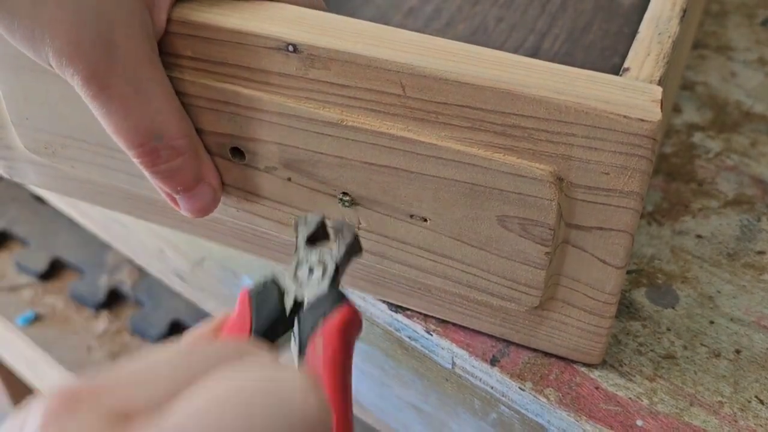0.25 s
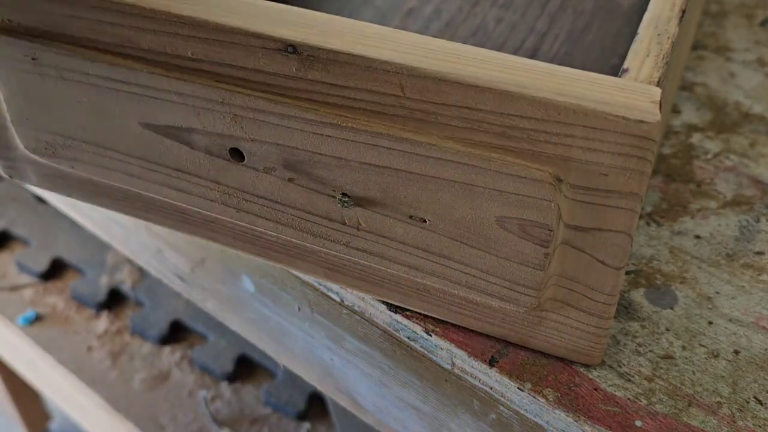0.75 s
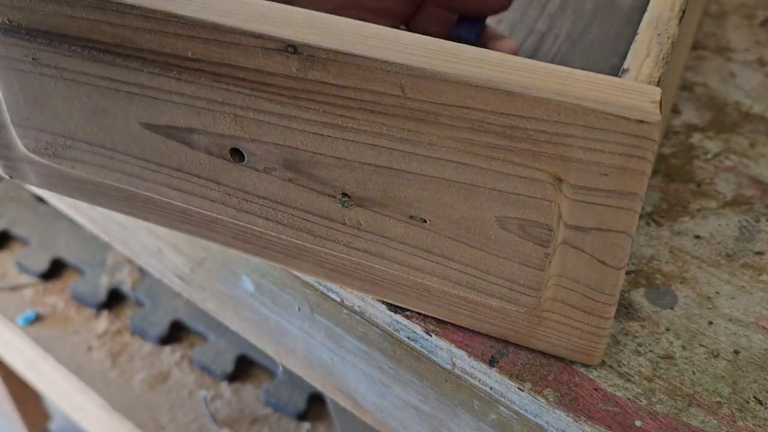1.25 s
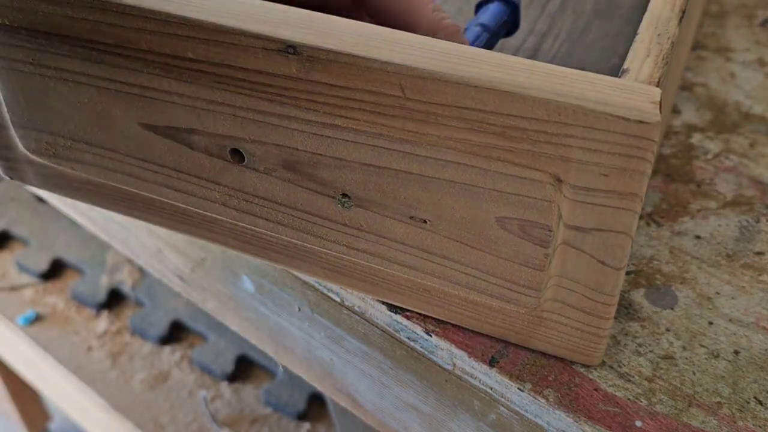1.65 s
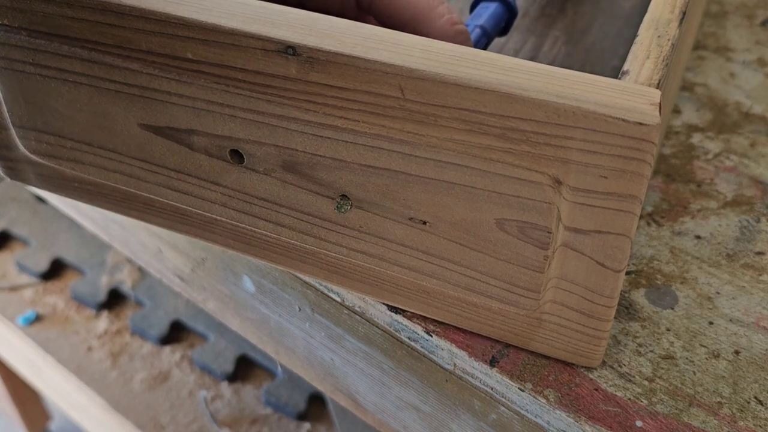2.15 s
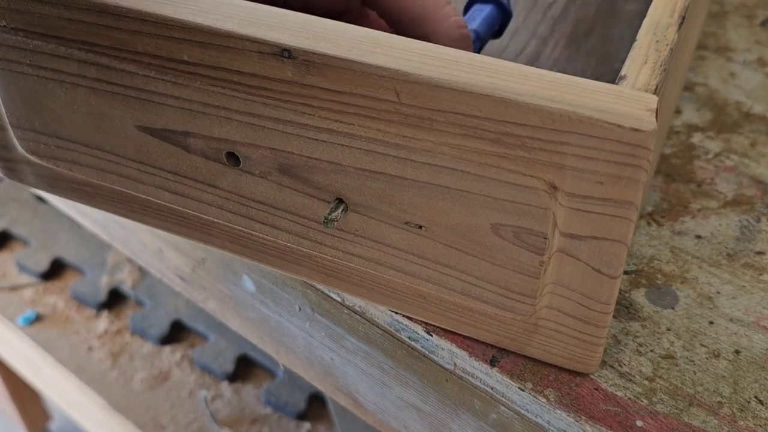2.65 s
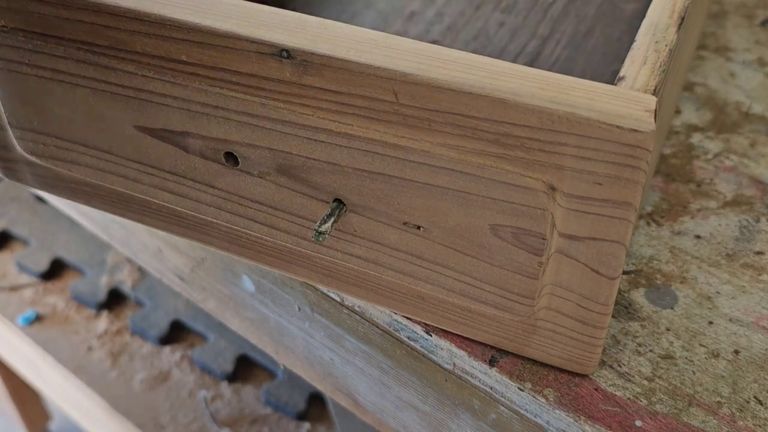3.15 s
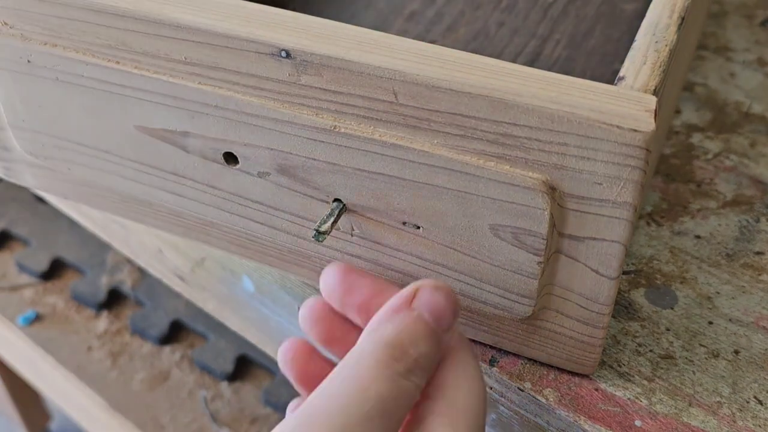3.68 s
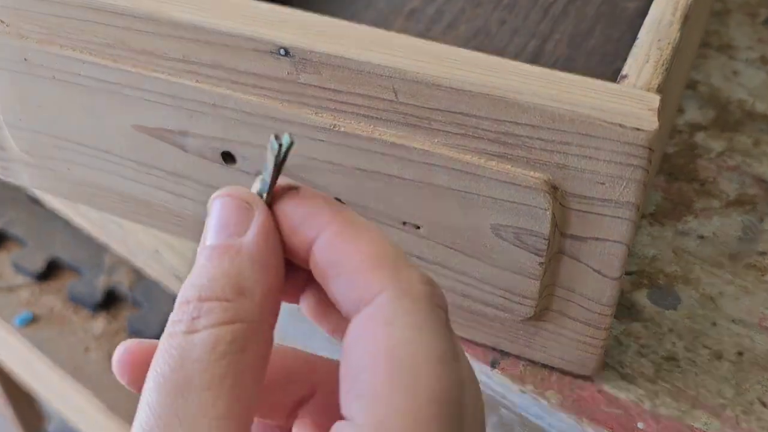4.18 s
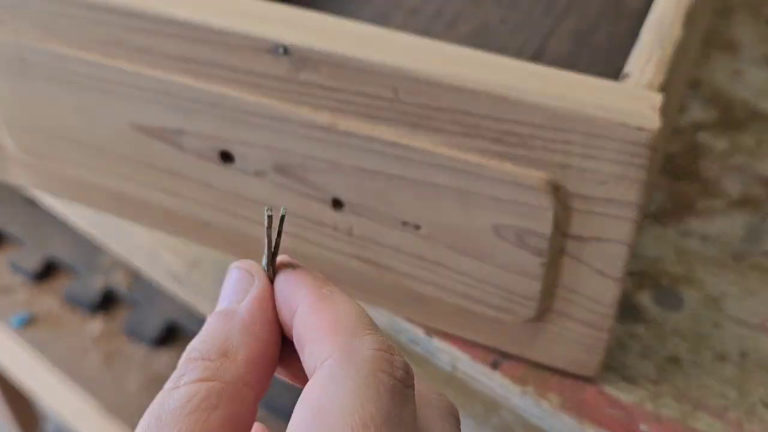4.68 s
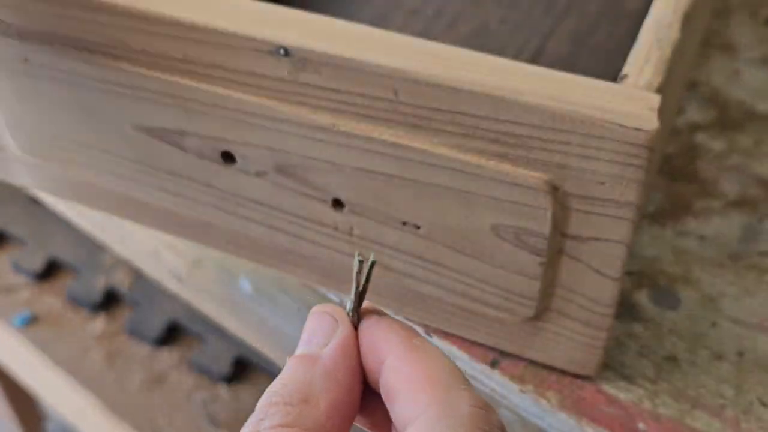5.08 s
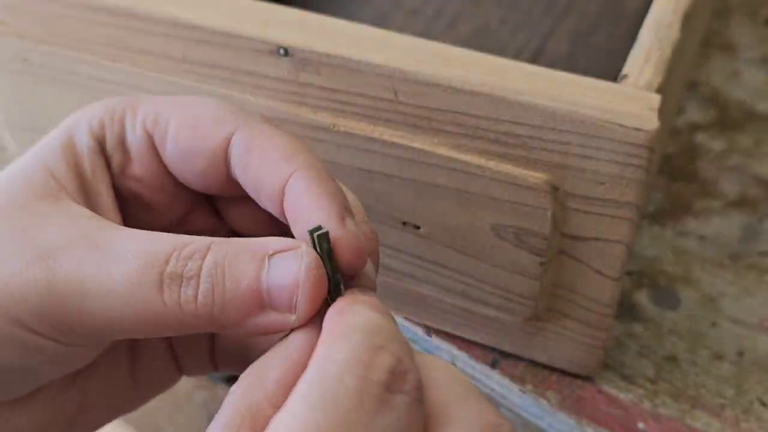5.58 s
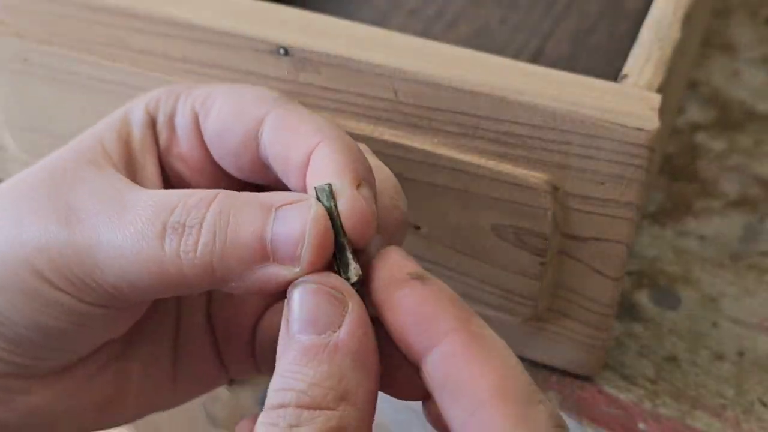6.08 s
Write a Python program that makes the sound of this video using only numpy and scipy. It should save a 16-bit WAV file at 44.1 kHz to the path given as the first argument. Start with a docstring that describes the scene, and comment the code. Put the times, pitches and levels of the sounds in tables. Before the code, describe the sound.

In a small quiet workshop, pliers are set down with a dull double knock. Soft taps on a hollow wooden drawer front follow, then a rusty nail rasps in quick short strokes with little squeaky slips, breaking loose in three sharp cracks. The drawer thuds, a lull follows, and a screwdriver clunks loudly on the bench and rocks gently. Close stereo microphone, faint hiss and low rumble.

```python
"""Rusty nail and screwdriver at a workbench

Pliers are laid on the bench; close by, a screwdriver works a rusty split nail through a wooden drawer front.
The tip taps, the nail rasps in quick strokes with small slips and breaks free in three sharp ones.
The drawer knocks, the screwdriver drops and rocks, over room hiss and a low rumble; gain control ducks loud blows.
Each contact is random tiny catches under a force curve, ringing a body's resonances; two sines add to the creaks."""
import sys
import numpy as np
from scipy import signal
from scipy.fft import rfft, irfft, next_fast_len
from scipy.io import wavfile
from scipy.ndimage import uniform_filter1d, map_coordinates

SR = 44100
rng = np.random.default_rng(int(sys.argv[2]) if len(sys.argv) > 2 else 0)


def int16_out(signal):
    """Quantize to a 16-bit WAV file."""
    q = np.round(np.clip(np.atleast_2d(signal).T, -1, 1) * 32767)
    wavfile.write(sys.argv[1], SR, q.astype(np.int16))


N = 279367

SIZE = 2 ** 15  # samples in one contact
T = np.arange(SIZE) / SR  # s
HZ = np.fft.rfftfreq(SIZE, 1 / SR)
FADE = np.clip((.66 - T) / .05, 0, 1)  # closes each contact's tail


def amp(db):
    """Decibels to gain."""
    return 10 ** (np.asarray(db) / 20)


def unit(x):
    """Scale to rms 1."""
    return x / np.sqrt(np.mean(np.abs(x) ** 2) + 1e-20)


def along(points, hz):
    """Interpolate (frequency [Hz], value) points on a log frequency axis."""
    point_hz, values = np.transpose(points)
    return np.interp(np.log(hz + 1), np.log(point_hz + 1), values)


def filtered(x, response):
    """Multiply the spectrum of x by a response of frequency."""
    size = next_fast_len(N + SR // 2)
    spectrum = rfft(x, size) * response(np.fft.rfftfreq(size, 1 / SR))
    return irfft(spectrum, size)[..., :N]


def wobble(rate):
    """A smooth random curve with this many knots a second."""
    knots = rng.standard_normal(int(N * rate / SR) + 4)
    return map_coordinates(knots, [np.arange(N) * rate / SR])


def add(track, s, x):
    """Mix x into track from time s."""
    start = round(s * SR)
    track[:, start:start + SIZE] += x[:, :N - start]


def blow(rise, t60):
    """A force that builds evenly and then dies away."""
    return np.minimum(T / rise, 1) * amp(-60 * np.maximum(T - rise, 0) / t60)


def swell(half):
    """A bell-shaped force, greatest three half lengths after its start."""
    return np.exp(-((T - 3 * half) / half) ** 2 / 2)


def causal(gain):
    """The minimum-phase response of this gain, which rings only after the blow."""
    cepstrum = irfft(np.log(np.maximum(gain / gain.max(), 1e-6)))
    fold = np.r_[1, np.full(SIZE // 2 - 1, 2), np.zeros(SIZE // 2)]
    return np.exp(rfft(cepstrum * fold))


def resonances(modes):
    """Gain of a body with these modes; wood damps them all, the higher ones more."""
    power = 0
    for hz, width, db in modes:
        damped_width = max(width, 20 + .04 * hz)
        power = power + (amp(db) / (1 + ((HZ - hz) / damped_width) ** 2)) ** 2
    return np.sqrt(power)


def tinted(gain, low_hz, high_hz, low_db, high_db):
    """Each contact sets how strongly the body's bass and treble answer, against its middle."""
    low = 1 / (1 + (HZ / low_hz) ** 12)
    high = 1 - 1 / (1 + (HZ / high_hz) ** 6)
    middle = (1 - low) * (1 - high)
    return unit(gain * middle) + amp(low_db) * unit(gain * low) + amp(high_db) * unit(gain * high)


def contact(force, gain, grain_db):
    """Tiny catches under a force curve shake a body; stereo, with the mid's loudest 4 ms at rms 1."""
    # side against mid at the microphones: (frequency [Hz], level [dB])
    side_width = [(100, -28.5), (300, -34.5), (550, -6.5), (750, -11), (1200, -1.5), (2200, -1.5),
                  (4000, -0.5), (12000, 1)]
    grain = amp(grain_db * rng.standard_normal(SIZE))  # the catches vary in strength
    catches = force * rng.standard_normal(SIZE) * grain
    for _ in range(3):  # a contact feeds all frequencies about alike
        flat = irfft(np.exp(1j * np.angle(rfft(catches))))
        catches = flat * force ** .25
    shaken = rfft(catches) * causal(gain)
    # the higher the mode, the more its phase differs between the two microphones
    turn = map_coordinates(rng.standard_normal(64), [HZ / 600], mode="nearest") * np.minimum(HZ / 1500, 2)
    side_response = amp(along(side_width, HZ)) * -1j * np.exp(1j * turn)
    mid, side = irfft([shaken, shaken * side_response]) * FADE
    loudest = np.sqrt(uniform_filter1d(mid ** 2, size=176).max())
    return np.array([mid + side, mid - side]) / loudest


def panel(ring_db, treble_db, squeak_hz, squeak_share):
    """The hollow drawer front rings in modes that vary a little; stick-slip favours multiples of its rate."""
    # resonances, each varied below: (frequency [Hz], least width [Hz], level [dB])
    panel_modes = [(729, 64, -11), (1331, 39, -4.5), (1500, 78, -4.5), (1640, 45, -1.5), (1830, 17, -3.5),
                   (2093, 26, 0.5), (3270, 370, -15), (3190, 91, -14), (3510, 68, -6.5), (4250, 490, -12.5),
                   (4607, 130, -12.5), (5360, 45, -17.5), (6180, 110, -21.5), (6430, 63, -16),
                   (7080, 520, -18.5), (7520, 420, -22.5), (8640, 28, -28.5), (9320, 240, -27.5),
                   (11800, 610, -25), (14400, 700, -28), (16100, 170, -31.5)]
    # broad colour before an 11 dB cut: (frequency [Hz], level [dB])
    panel_colour = [(150, -37), (250, -28), (538, -39.5), (723, 1), (988, -22.5), (1310, -13), (2090, -39),
                    (2360, 0), (3170, 0), (5730, -27), (9170, -10.5), (10000, -23), (16000, -55)]
    modes = []
    for hz, width, db in panel_modes:
        shift, lift = rng.standard_normal(2)
        moved_hz = hz * (1 + .012 * shift * (hz > 1000))  # higher modes move with the nail
        modes.append((moved_hz, width, db + 2 * lift))
    body = resonances(modes) + amp(-11.0) * amp(along(panel_colour, HZ))
    squeak = 1 / np.abs(1 - squeak_share * np.exp(2j * np.pi * HZ / squeak_hz))
    return tinted(body * squeak, 1135, 5770, ring_db, treble_db)


def slips():
    """The nail lets go in a squeak of a few milliseconds, and the panel rings on."""
    # slips, creep included, before a 1 dB cut to the slip alone:
    # (time [s], level [dB], panel ring [dB], treble [dB], length [s], squeak rate [Hz])
    slip_rows = [(1.788, -13.5, -4, -9.5, 0.0029, 1544), (2.0397, -19, -3, -9.5, 0.0041, 1550),
                 (2.2222, -21, 2.5, -13, 0.0024, 1460), (2.299, -23, 0.5, -1, 0.0015, 1800),
                 (2.536, -6.5, 4, -4.5, 0.0062, 1476), (2.606, -6, 2, -9, 0.0063, 1530),
                 (2.683, -2.5, 1.5, -5, 0.0036, 1514)]
    creep_db = -23  # against the slip's level in the table
    out = np.zeros((2, N))
    for s, db, ring_db, treble_db, length, squeak_hz in slip_rows:
        grip = np.minimum(T / .001, 1)
        growth_db = -3 * np.maximum(1 - T / length, 0)
        release_db = -60 * np.maximum(T - length, 0) / 0.0217
        force = grip * amp(growth_db + release_db)
        body = panel(ring_db, treble_db, squeak_hz, squeak_share=.4)
        # the rust starts to give just before
        creep = amp(db + creep_db) * contact(swell(0.0024), body, grain_db=2.0)
        add(out, s - .007, creep)
        add(out, s, amp(db - 1.0) * contact(force, body, grain_db=-0.5))
    return out


def rubs():
    """Each twist drags rust through wood and shoves the drawer; friction locks to the main mode and creaks."""
    # the nail rubs in its hole: (middle time [s], rasp level [dB], creak level [dB])
    rub_rows = [(1.801, -24.5, -50), (1.869, -29, -35.5), (1.936, -31.5, -38.5), (2.007, -33.5, -45),
                (2.056, -25.5, -57), (2.123, -25.5, -52), (2.190, -33.5, -29.5), (2.237, -27, -18),
                (2.301, -33, -50), (2.352, -25.5, -29.5), (2.422, -30, -30), (2.495, -37.5, -42)]
    # the shoved drawer's resonances: (frequency [Hz], least width [Hz], level [dB])
    shove_modes = [(118.6, 45, -2), (241, 190, -7.5), (434, 75, -8.5)]
    half_s = 0.0102  # half the length of a twist
    first_shove_db, shove_fall_db_per_s = -3.5, 11  # against the rasp: weaker as the nail loosens
    first_treble_db, treble_rise_db_per_s = -8.5, 7  # brighter as the nail loosens
    out = np.zeros((2, N))
    force = swell(half_s)
    for s, rasp_db, creak_db in rub_rows:
        worked_s = s - rub_rows[0][0]
        treble_db = first_treble_db + treble_rise_db_per_s * worked_s
        shove_db = rasp_db + first_shove_db - shove_fall_db_per_s * worked_s
        # random rust roughness, 1800 knots a second
        rust = amp(3.5 * map_coordinates(rng.standard_normal(2000), [T * 1800]))
        squeak_hz = 1830 * np.exp(.12 * rng.standard_normal())
        body = panel(-6.5, treble_db, squeak_hz, squeak_share=0.41)
        rasp = amp(rasp_db) * contact(force * rust, body, grain_db=4.5)
        creak_hz = 738 * (1 + 0.0055 * rng.standard_normal())
        phase = 2 * np.pi * creak_hz * T + np.array([[0], [.25]])  # left and right
        creak = amp(creak_db) * np.sqrt(2) * force * np.sin(phase)
        shove = amp(shove_db) * contact(force, resonances(shove_modes), grain_db=0.0)
        add(out, s - 3 * half_s, rasp + creak + shove)
    return out


def taps():
    """The tip feels for the nail: a soft click, the panel's ring and the drawer's low note."""
    # taps: (time [s], level [dB], panel ring [dB], click [Hz], force rise [s], force t60 [s])
    tap_rows = [(0.901, -33.5, -7, 990, 0.0045, 0.044), (1.3, -22.5, 23.5, 1570, 0.0012, 0.067),
                (1.454, -26.5, 15.5, 1470, 0.0047, 0.133), (1.518, -39, 9.5, 875, 0.0063, 0.14)]
    out = np.zeros((2, N))
    for s, db, ring_db, click_hz, rise, t60 in tap_rows:
        body = resonances([(250, 70, 3), (732, 50, ring_db), (click_hz, 340, 0), (2800, 1400, -22)])
        add(out, s, amp(db) * contact(blow(rise, t60), body, grain_db=6.5))
    return out


def knocks(rows, modes, colour, colour_db):
    """Dull blows on wood: the contact chatters, builds and dies away."""
    out = np.zeros((2, N))
    body = resonances(modes) + amp(colour_db + along(colour, HZ))
    for s, db, bass_db, tick_db, rise, t60, soft_hz in rows:
        softened = body * (.15 + 1 / (1 + (HZ / soft_hz) ** 4))
        toned = tinted(softened, 408, 3130, bass_db, tick_db)
        add(out, s, amp(db + 2.5) * contact(blow(rise, t60), toned, grain_db=5.0))
    return out


def pliers():
    """The pliers are laid down, and each blow rings a set of mostly low modes."""
    # knocks before a 2.5 dB lift: (time [s], level [dB], bass [dB], tick [dB],
    # force rise [s], force t60 [s], softness cut-off [Hz])
    pliers_knocks = [(.223, -38, -10.5, -17, 0.013, 0.078, 4000), (.455, -15.5, 0, -25, 0.011, 0.19, 3980),
                     (.497, -24, 1.5, -42.5, 0.0196, 0.085, 1110),
                     (.657, -38.5, -4.5, -15.5, 0.0077, 0.13, 3000)]
    # resonances: (frequency [Hz], least width [Hz], level [dB])
    pliers_modes = [(205, 9.7, -16), (270, 15, -3), (293, 25, 0.5), (382, 17, -4), (492, 19, -8),
                    (630, 40, -13), (678, 18, -9.5), (840, 13, -10.5), (1103, 56, -13), (1310, 32, -21),
                    (1500, 310, -26.5), (1930, 26, -25.5)]
    # broad colour before colour_db: (frequency [Hz], level [dB])
    pliers_colour = [(47, -47), (80, -26), (190, 0), (222, -17), (253, -0.5), (431, -20), (471, -4),
                     (588, -22.5), (839, -26), (917, -48), (1900, -38.5), (16000, -50.5)]
    return knocks(pliers_knocks, pliers_modes, pliers_colour, colour_db=6.5)


def drawer():
    """The drawer knocks, a wooden body with strong low modes."""
    # knocks before a 2.5 dB lift: (time [s], level [dB], bass [dB], tick [dB],
    # force rise [s], force t60 [s], softness cut-off [Hz])
    drawer_knocks = [(2.940, -17, 6, -21.5, 0.0071, 0.12, 4000), (3.368, -40.5, 14, -24, 0.0072, .12, 2500)]
    # resonances: (frequency [Hz], least width [Hz], level [dB])
    drawer_modes = [(118.8, 60, -18.5), (194, 22, 2.5), (308, 17, -1), (390, 60, -23), (653, 37, -12),
                    (730, 62, -14), (820, 32, -32), (1190, 54, -42), (1314, 44, -19.5), (1590, 64, -26),
                    (2060, 36, -30.5)]
    # broad colour before colour_db: (frequency [Hz], level [dB])
    drawer_colour = [(50, -17), (110, -10), (300, -26), (450, -45), (800, -24), (1500, -44), (3500, -33.5),
                     (8000, -45), (16000, -50)]
    return knocks(drawer_knocks, drawer_modes, drawer_colour, colour_db=-3.5)


def screwdriver():
    """The screwdriver knocks on the bench and rings its broad wooden modes."""
    # knocks before a 2.5 dB lift: (time [s], level [dB], bass [dB], tick [dB],
    # force rise [s], force t60 [s], softness cut-off [Hz])
    driver_knocks = [(3.057, -21, 3, -25, 0.016, 0.12, 1500), (3.111, -20, 9, -26, 0.0019, 0.12, 1140),
                     (4.846, -11.5, 1.5, -27, 0.00069, 0.049, 3476),
                     (4.858, -10, -7, -21.5, 0.00091, 0.024, 4000),
                     (4.861, -10.5, 0, -21.5, 0.0038, 0.41, 2280),
                     (4.927, -11.5, -14, -44, 0.00036, 0.026, 935),
                     (4.932, -18.5, 1.5, -27, 0.004, 0.346, 1210)]
    # bench resonances: (frequency [Hz], least width [Hz], level [dB])
    bench_modes = [(206.4, 10, -4.5), (286, 42, -3.5), (385, 43, -9.5), (438, 77, -7), (476, 61, -7.5),
                   (568, 64, -4.5), (650, 92, -12.5), (844, 110, -7.5), (1060, 15, -11.5),
                   (1220, 18, -37.5), (1316, 210, -12.5), (1760, 56, -23), (2305, 110, -28)]
    # broad colour before colour_db: (frequency [Hz], level [dB])
    bench_colour = [(35, -44), (60, -22), (146, -4), (193, -25), (227, -28), (274, 2), (371, -15),
                    (566, 1.5), (715, 0), (842, -3.5), (1220, -17.5), (1410, -14.5), (16000, -53.5)]
    return knocks(driver_knocks, bench_modes, bench_colour, colour_db=-11.5)


def rocking():
    """The screwdriver's handle tips from one flat to the next, more softly towards the end."""
    # tips before a 1.5 dB cut: (time [s], level [dB])
    rock_rows = [(5.161, -29), (5.231, -35.5), (5.301, -35), (5.351, -40), (5.403, -37), (5.484, -39.5),
                 (5.609, -42)]
    # resonances: (frequency [Hz], least width [Hz], level [dB])
    rock_modes = [(407, 210, 3), (475, 58, 3.5), (660, 83, -6.5)]
    out = np.zeros((2, N))
    for s, db in rock_rows:
        add(out, s, amp(db - 1.5) * contact(amp(-60 * T / 0.15), resonances(rock_modes), grain_db=10))
    return out


def scratches():
    """Bright ticks and faint rustles, heard to the left, as metal and fingers brush the wood."""
    # small scratches before a 1.5 dB cut and the lean left: (time [s], level [dB], force t60 [s])
    tick_rows = [(0.6794, -51, 0.14), (0.9247, -55, 0.079), (1.352, -54, 0.05), (1.702, -45.5, 0.037),
                 (3.112, -42.5, 0.021), (3.491, -50, 0.05), (3.5598, -52, 0.15), (3.5894, -54.5, 0.05),
                 (4.4017, -55, 0.05), (4.8465, -28.5, 0.032), (4.93, -41, 0.031)]
    # hands brush the wood, before the lean left: (middle time [s], level [dB], half length [s])
    rustle_rows = [(3.423, -58.5, 0.11), (3.636, -64, 0.1), (4.651, -63, 0.088)]
    # colour of both: (frequency [Hz], level [dB])
    scratch_colour = [(1000, -6.5), (3000, -5.5), (8000, -10.5), (15000, -19.5)]
    out = np.zeros((2, N))
    bright = amp(along(scratch_colour, HZ))
    for s, db, t60 in tick_rows:
        add(out, s, amp(db - 1.5) * contact(amp(-60 * T / t60), bright, grain_db=8.5))
    for s, db, half in rustle_rows:
        add(out, s - 3 * half, amp(db) * contact(swell(half), bright, grain_db=7.5))
    return out * amp([[2.5], [-2.5]])


def room(x):
    """The small workshop answers briefly, at a different decay for each frequency."""
    # decay: (frequency [Hz], t60 [s])
    decay = [(150, 0.085), (700, 0.082), (3000, 0.1), (14000, 0.061)]
    hz, t, z = signal.stft(rng.standard_normal((2, SR // 2)), SR, nperseg=256)
    fall = amp(-60 * t / along(decay, hz)[:, None])
    tail = signal.istft(z * fall, SR, nperseg=256)[1]
    tail = np.pad(tail, ((0, 0), (SR // 200, 0)))  # 5 ms before the first reflection
    return signal.fftconvolve(x, tail / np.linalg.norm(tail[0]), axes=1)[:, :N]


def air(colour):
    """Coloured stereo noise whose mid has rms 1."""
    # side against mid: (frequency [Hz], level [dB])
    air_width = [(60, -10.5), (110, -15.5), (200, -15), (380, -5), (700, -3.5), (1290, 2), (2380, 1),
                 (4400, -1), (8120, 0.5), (15000, 0)]

    def response(hz):
        return amp(along(colour, hz)) * amp([0 * hz, along(air_width, hz)])

    mid, side = filtered(rng.standard_normal((2, N)), response)
    return np.array([mid + side, mid - side]) / mid.std()


def hiss():
    """The still room's steady noise."""
    # relative colour: (frequency [Hz], level [dB])
    hiss_colour = [(88, -38.5), (150, 1.5), (200, -7), (300, -8), (400, -14.5), (470, -11.5), (750, -15.5),
                   (1300, -17.5), (2500, -21.5), (4400, -23.5), (5300, -31), (8000, -36.5), (10500, -44),
                   (15800, -46)]
    return amp(-48.5) * air(hiss_colour)


def rumble():
    """Lumpy low noise, which swells briefly at each soft bump as the hands shift their hold."""
    # relative colour: (frequency [Hz], level [dB])
    rumble_colour = [(12, -33.5), (20, -12.5), (64, -1), (109, -5), (121, -5.5), (135, -27), (173, -16),
                     (205, -18), (231, -18), (260, -20), (340, -40), (570, -120)]
    # slow level, before the quick swings: (time [s], level [dB])
    slow_level = [(0.0, -41), (1.1, -41), (1.85, -37), (2.2, -41), (2.75, -38.5), (3.25, -41), (3.6, -39),
                  (4.05, -46.5), (4.5, -39.5), (4.9, -36), (5.7, -44.5), (6.33, -44.5)]
    # bumps: (middle time [s], level [dB])
    bump_rows = [(1.245, -30), (1.57, -29), (2.365, -29.5), (3.56, -33.5), (3.89, -34.5), (4.335, -36)]
    lump_db, lumps_per_s = 2, 16  # quick random swings
    bump_half_s = 0.021  # half the length of a bump
    t = np.arange(N) / SR
    slow_db = np.interp(t, *np.transpose(slow_level))
    steady = amp(slow_db + lump_db * wobble(lumps_per_s))
    bumps = sum(amp(db) * np.exp(-((t - s) / bump_half_s) ** 2 / 2) for s, db in bump_rows)
    return np.hypot(steady, bumps) * air(rumble_colour)


def scene():
    """The near nail, the tools on the bench and the room around them."""
    # balance of the microphones: (frequency [Hz], left minus right [dB])
    lean = [(40, 1.5), (90, -3.5), (200, 2), (600, -0.5), (1500, 1), (5000, 0), (9000, 1.5), (14000, 2)]
    nail = slips() + rubs() + taps()
    wood = pliers() + drawer() + screwdriver() + rocking()
    reflected = room(amp(-14.5) * nail + amp(-9.5) * wood)
    sound = nail + wood + scratches() + reflected + hiss() + rumble()
    return filtered(sound, lambda hz: amp(np.outer([.5, -.5], along(lean, hz))))


def record(dry):
    """Gain control ducks at once on loud peaks and recovers slowly; then the band limit."""
    level = np.sqrt(np.abs(uniform_filter1d(np.mean(dry ** 2, axis=0), size=130)))
    excess_db = 20 * np.log10(np.maximum(level / amp(-9.5), 1))
    recovery = np.exp(-np.arange(N) / SR / 0.87)  # time constant 0.87 s
    duck_db = np.maximum.accumulate(excess_db / recovery) * recovery
    ducked = dry * amp(-uniform_filter1d(duck_db, size=90))
    return filtered(ducked, lambda hz: hz < 16000)


dry = scene()
out = record(dry)
int16_out(out)
```